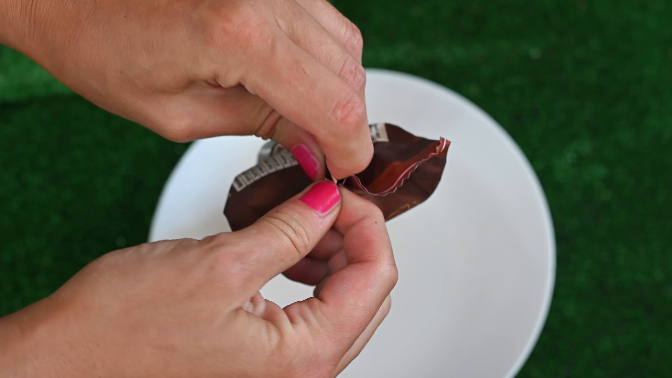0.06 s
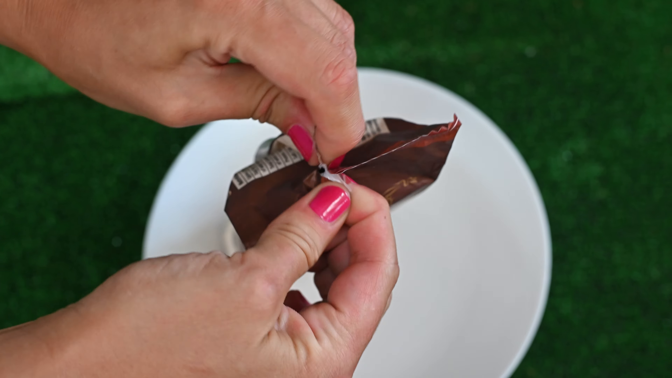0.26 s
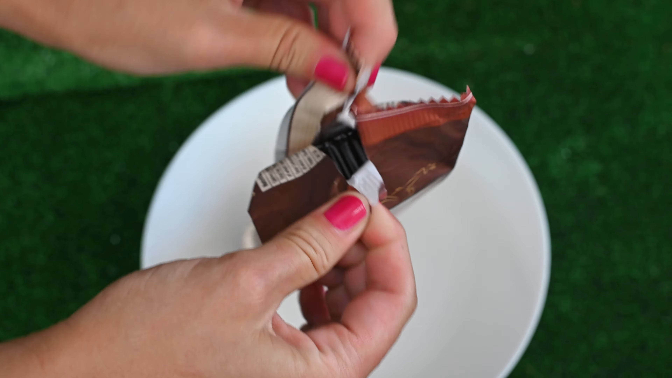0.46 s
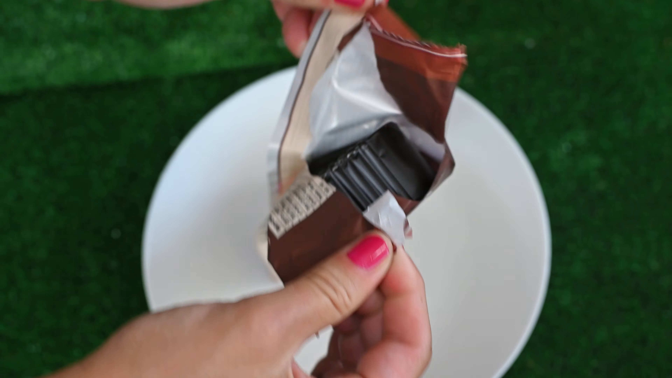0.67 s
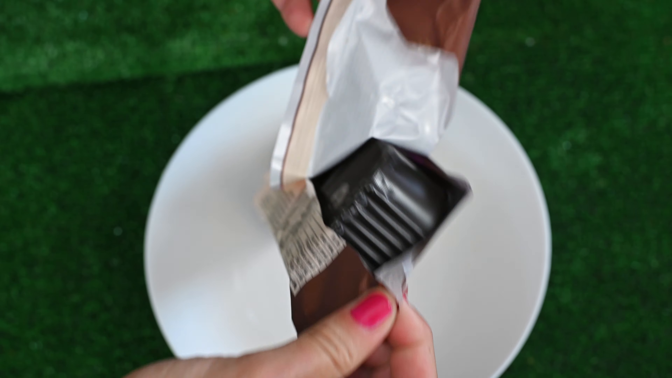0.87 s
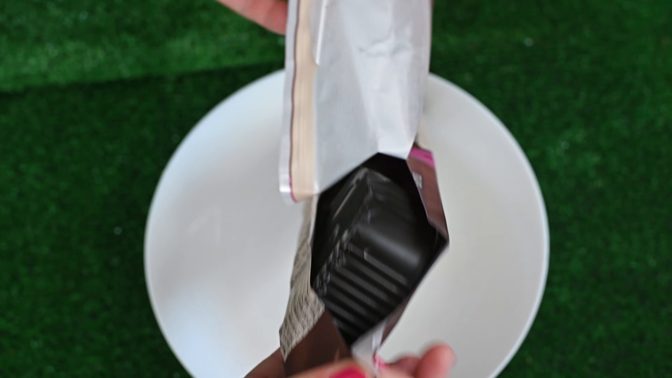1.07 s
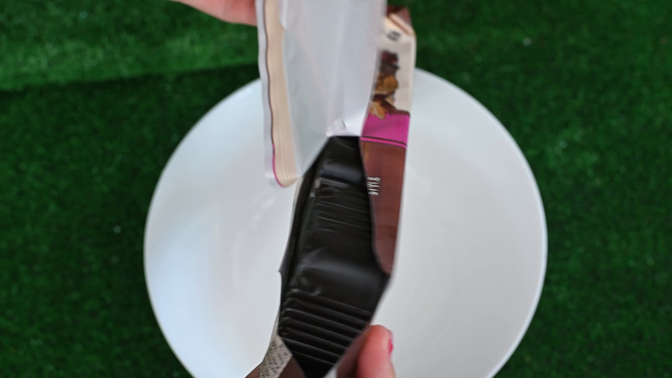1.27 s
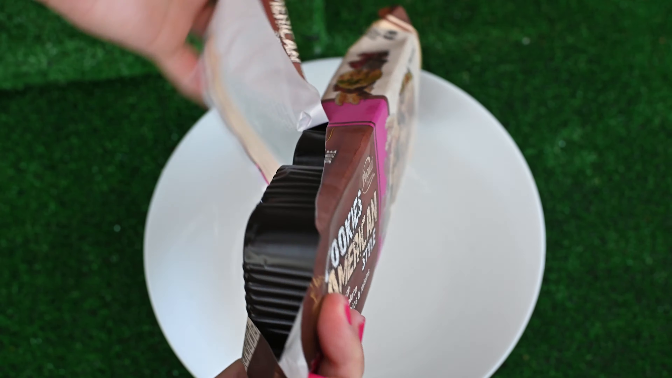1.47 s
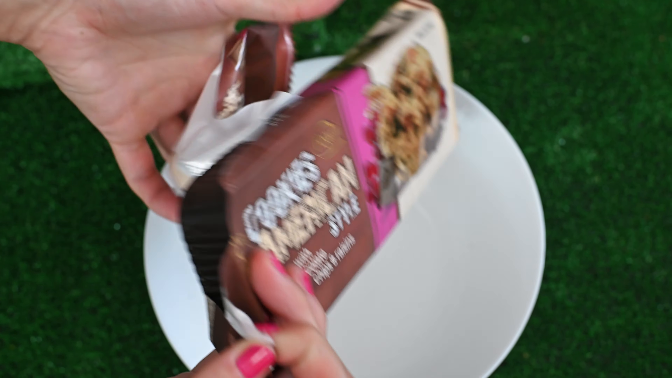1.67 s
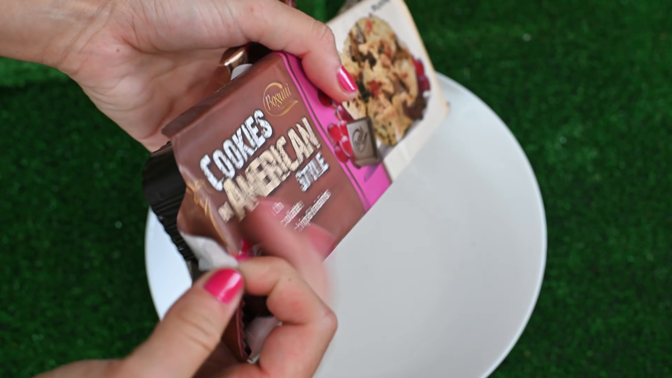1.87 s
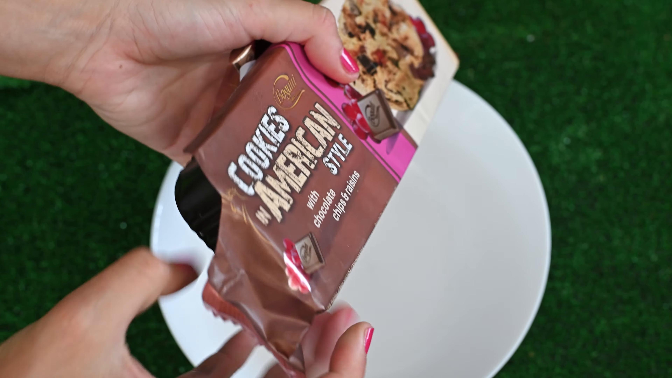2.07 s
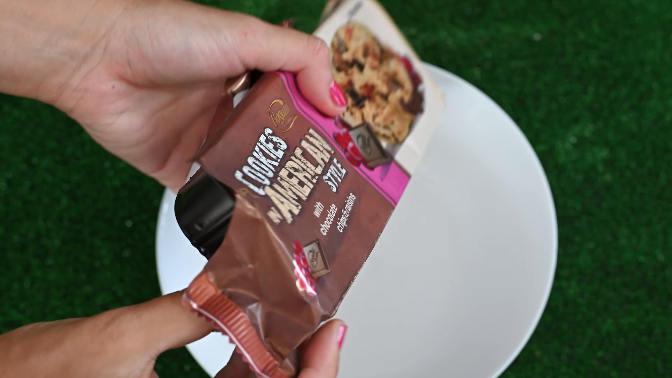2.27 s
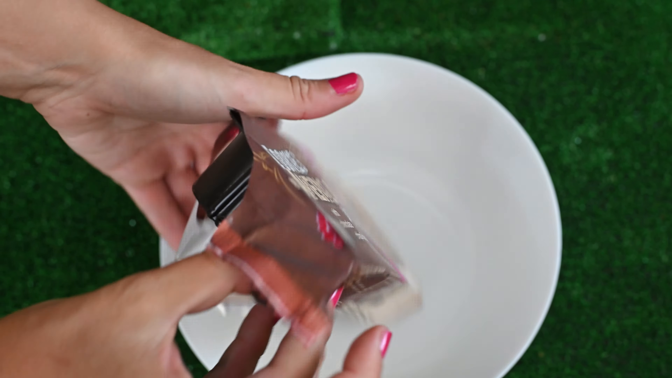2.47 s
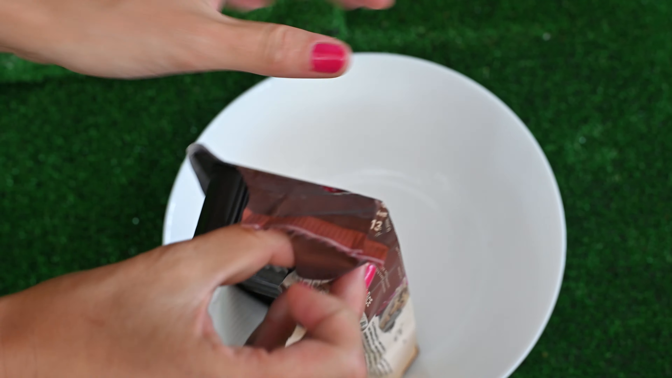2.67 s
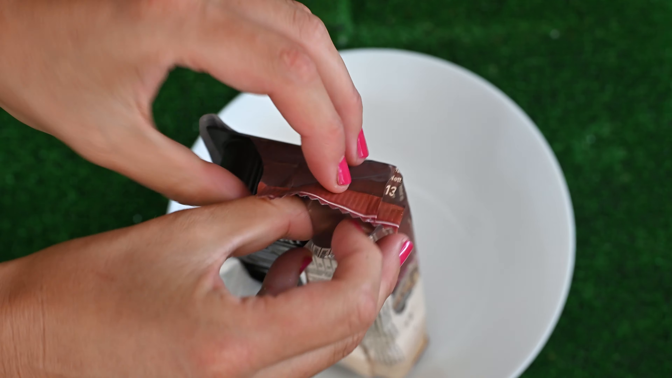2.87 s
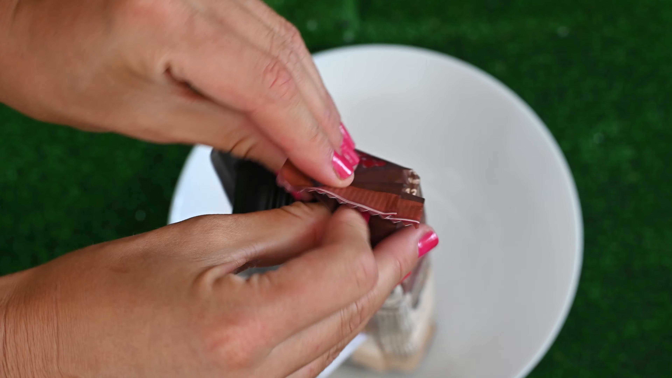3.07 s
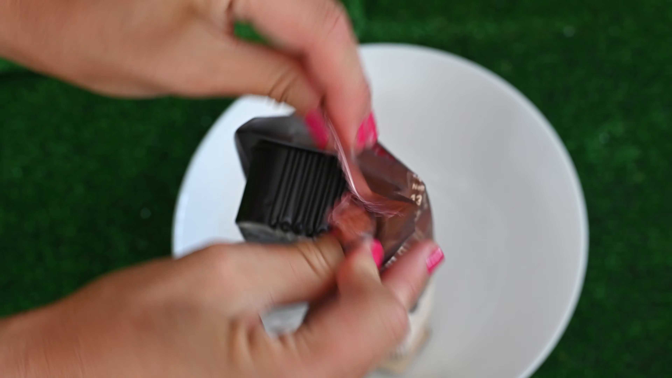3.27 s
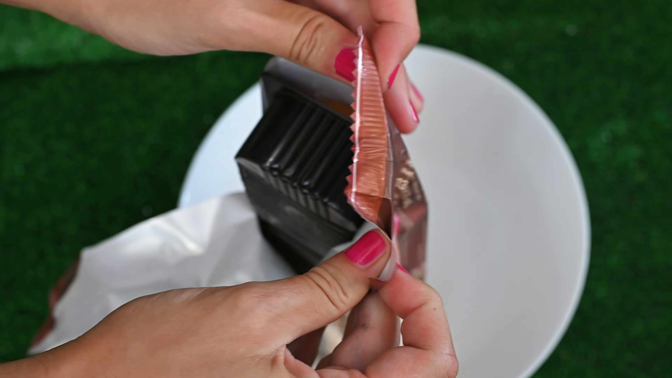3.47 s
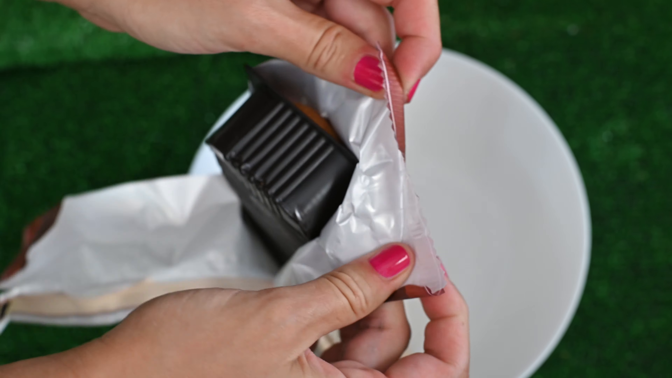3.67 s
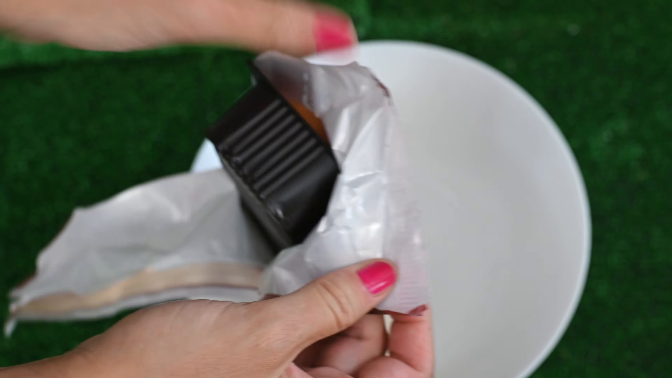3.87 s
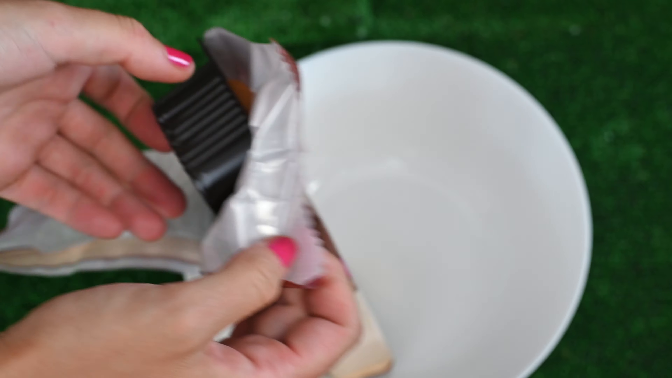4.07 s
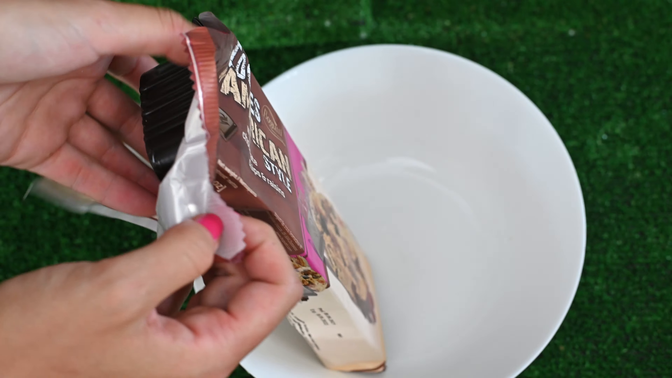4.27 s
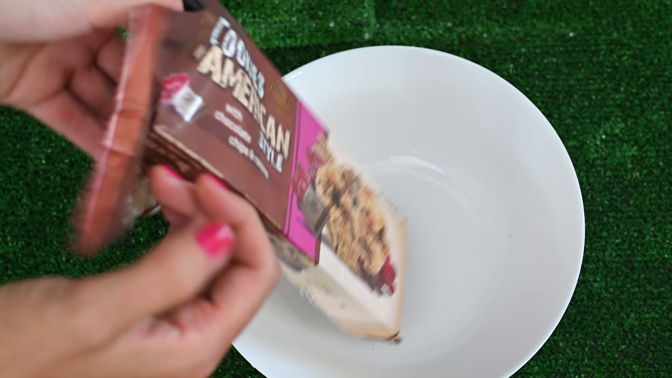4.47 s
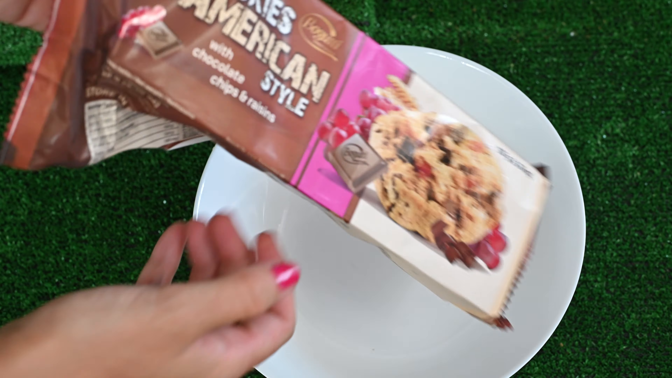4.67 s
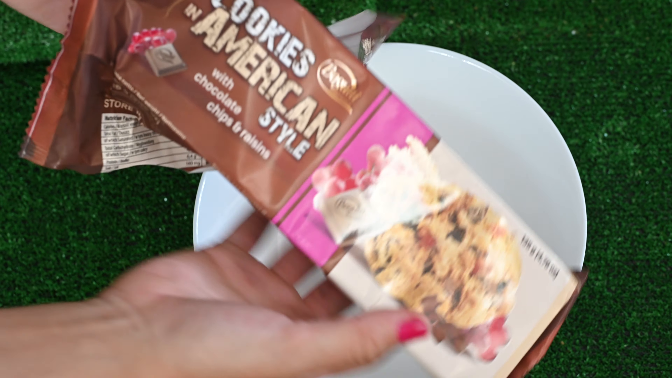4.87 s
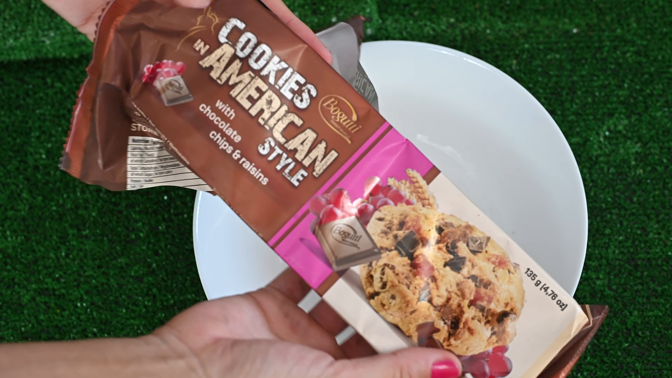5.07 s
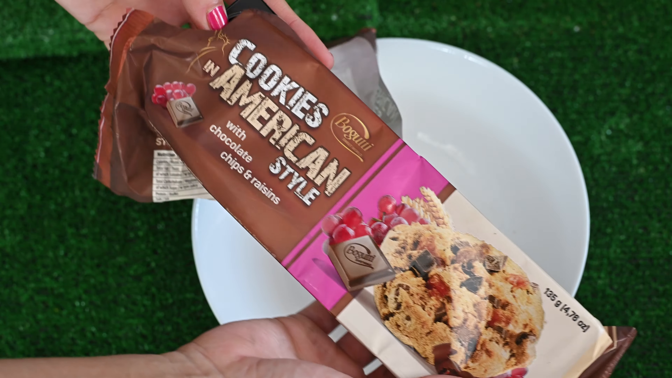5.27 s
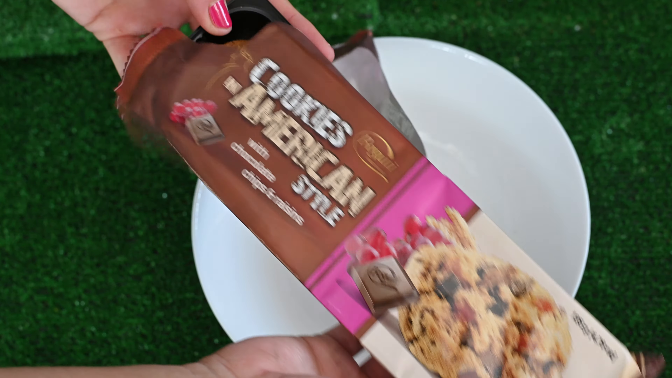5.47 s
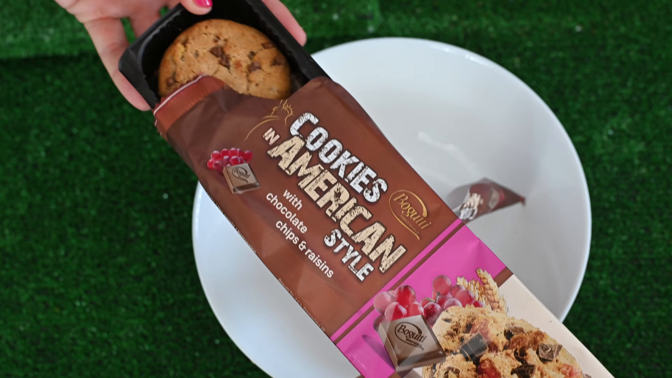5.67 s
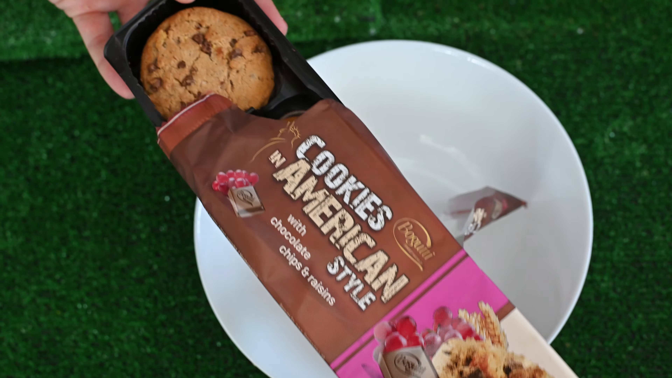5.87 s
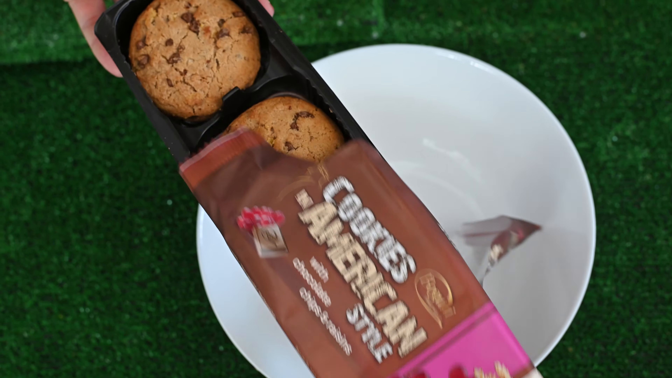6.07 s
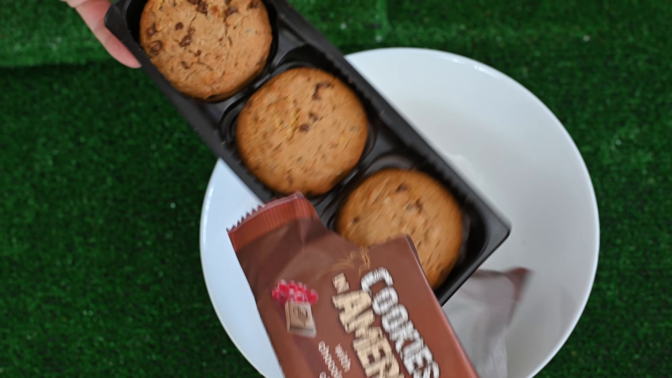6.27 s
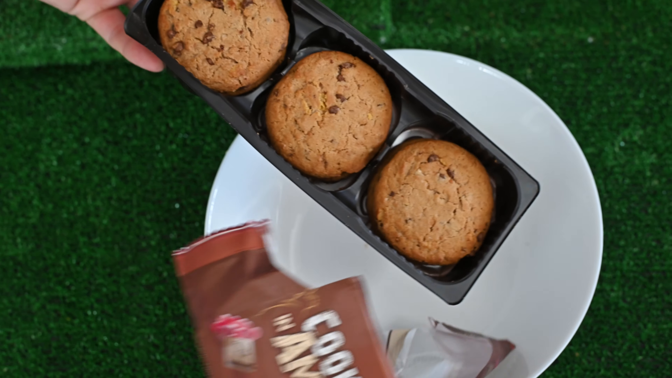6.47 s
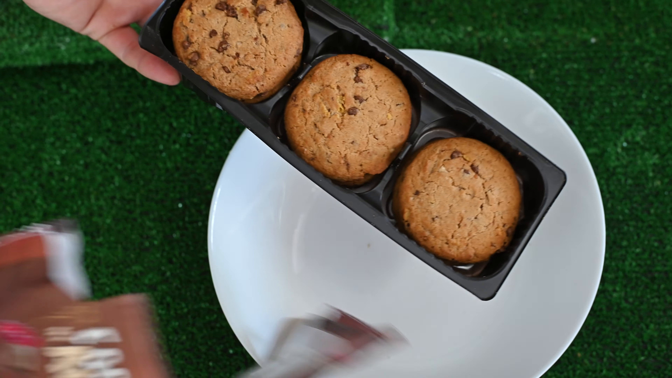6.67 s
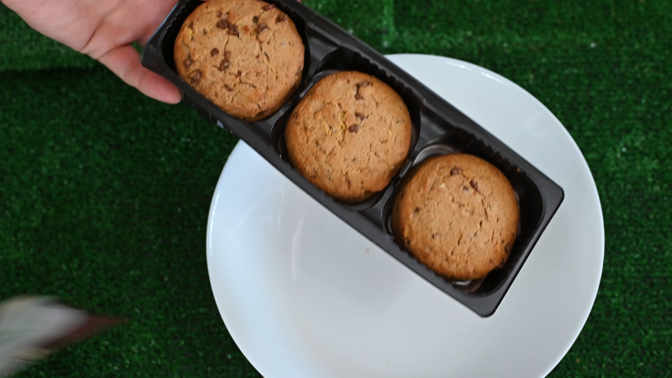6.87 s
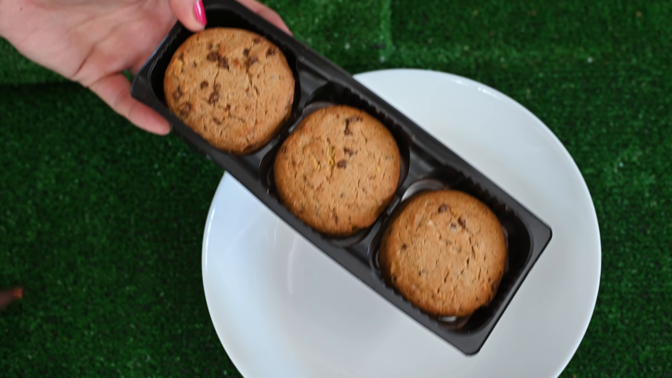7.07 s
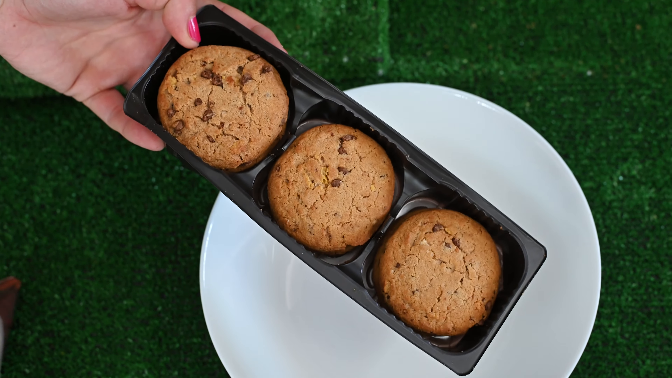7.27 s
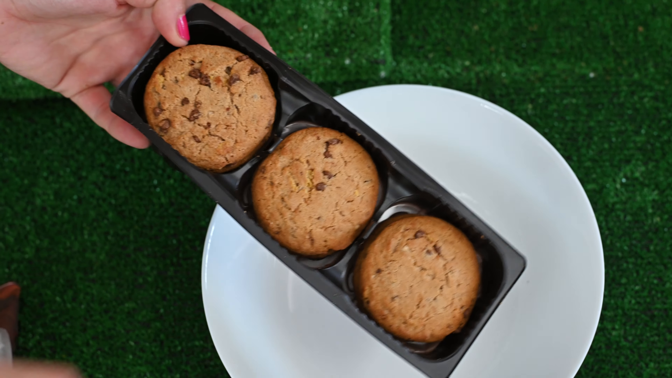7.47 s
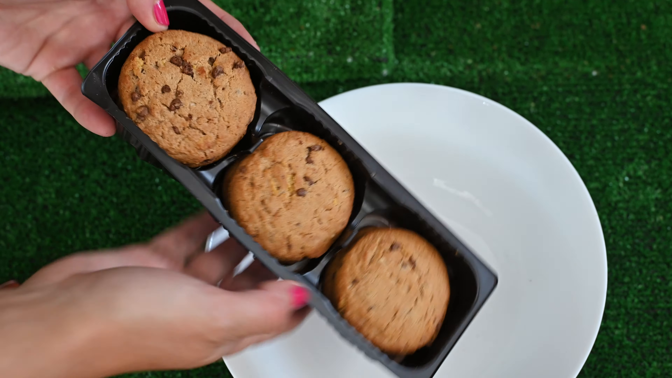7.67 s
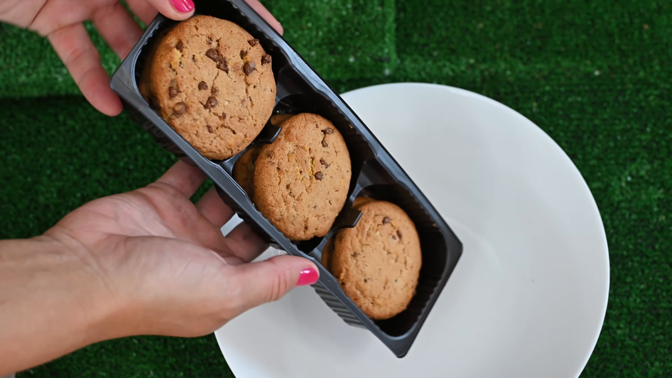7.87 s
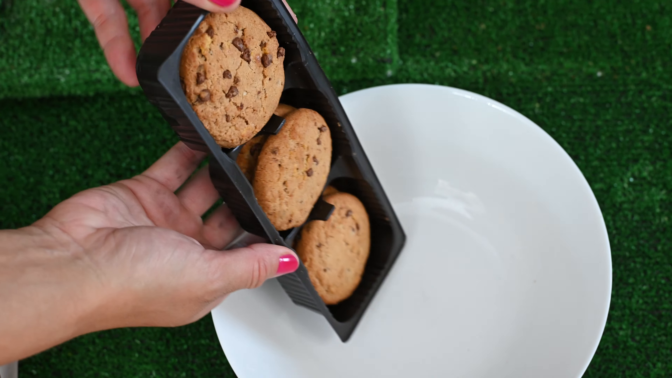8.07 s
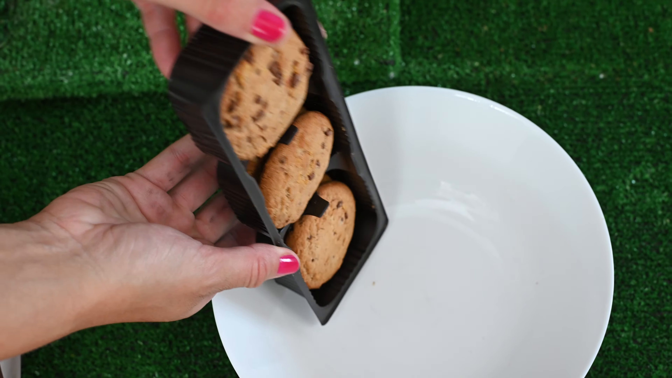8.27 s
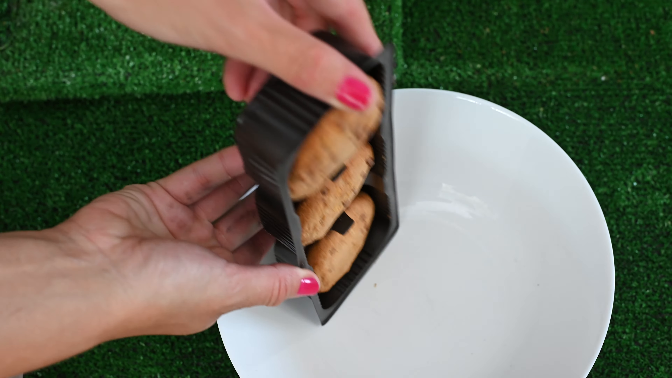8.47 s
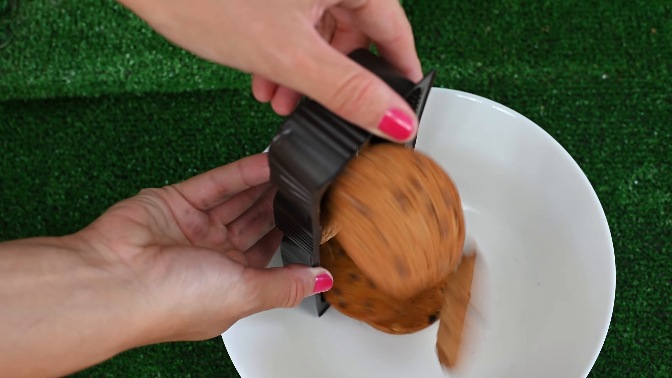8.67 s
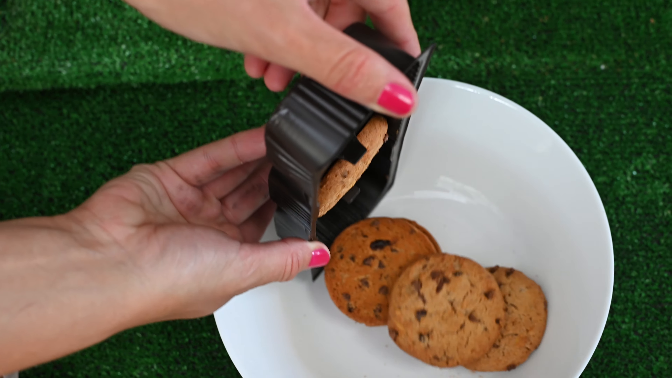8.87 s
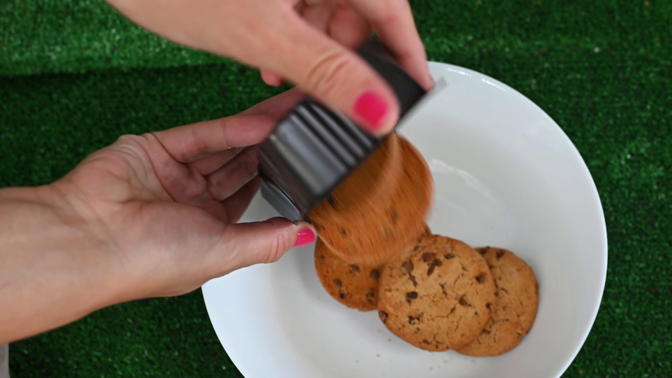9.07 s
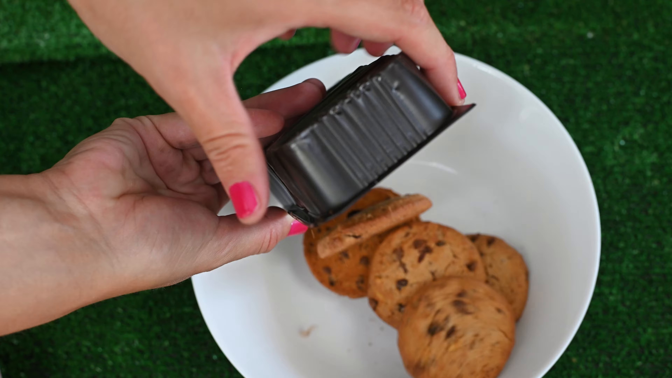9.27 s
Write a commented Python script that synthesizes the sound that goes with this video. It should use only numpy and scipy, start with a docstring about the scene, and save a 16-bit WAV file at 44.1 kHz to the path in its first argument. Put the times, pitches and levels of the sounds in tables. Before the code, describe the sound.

A thin plastic wrapper crinkles and tears open close by, then cookies tumble from a plastic tray into a ringing china bowl.

```python
"""A foil-plastic cookie wrapper is torn open close by; hands slide out the thin tray and tip it over a
china bowl. Buckling makes the crackle: tiny creases rustle with each stroke of the hands, big ones snap
singly, and the tray clicks as it bends. The cookies' impacts excite the normal modes of the bowl and
the table. A small room reverberates, over steady air noise and a low mains hum."""
import sys
import numpy as np
from scipy import signal
from scipy.fft import rfft, irfft
from scipy.io import wavfile
from scipy.ndimage import uniform_filter1d

SR = 44100
rng = np.random.default_rng(int(sys.argv[2]) if len(sys.argv) > 2 else 0)


def persist_wave(psi):
    """Save psi, clipped to +-1, as 16-bit WAV."""
    counts = np.round(np.clip(psi, -1, 1) * 32767).astype(np.int16)
    wavfile.write(sys.argv[1], SR, np.atleast_2d(counts).T)


N = 410571
T = np.arange(N) / SR

# Event levels are relative: each source applies its own gains to them.
# big creases of the wrapper buckling: start_s, facet_hz, level_db, brightness_db
WRAPPER_SNAPS = [(0.1362, 4730, -42.5, -11), (0.159, 3210, -41, -7), (0.1935, 3380, -42, 6),
                 (0.2135, 5860, -41.5, 4), (0.235, 5060, -29.5, 2), (0.296, 3200, -21.5, -3),
                 (0.3211, 4670, -33, -2), (0.3452, 5450, -33, -1), (0.3558, 10000, -29, -2),
                 (0.375, 5000, -42, -1), (0.3918, 1330, -33, -2.5), (0.402, 5480, -35.5, 3.5),
                 (0.4196, 4470, -35.5, 1), (0.4546, 5700, -29.5, 7.5), (0.4667, 4340, -29.5, 6),
                 (0.4914, 4800, -27, 1), (0.516, 3320, -29, 0.5), (0.539, 2450, -35.0, -8),
                 (0.5641, 3700, -34.5, -1), (0.6707, 5700, -32.5, 0.5), (0.72, 4670, -25.0, 0),
                 (0.7457, 4600, -29.5, 5), (0.756, 4450, -23, -3), (0.7936, 4770, -23, 2),
                 (0.8184, 3850, -32, 3), (0.8408, 7440, -24, 2.5), (0.8631, 1180, -23.5, -0.5),
                 (0.8945, 3800, -26, 0.5), (0.9201, 5650, -24.5, 2.5), (0.956, 1170, -27.5, -5.5),
                 (1.0056, 4500, -38.0, 3), (1.0591, 5280, -34, 6), (1.1, 5750, -33.5, -3),
                 (1.25, 5160, -35, -1), (1.403, 2150, -35.5, -1.5), (1.434, 4290, -30.0, -1.5),
                 (1.497, 2130, -25.5, 0), (1.5509, 4830, -32.5, 0), (1.6434, 5130, -28, 5.5),
                 (1.672, 5180, -32, 1.5), (1.7502, 2440, -33, 1.5), (1.8277, 3830, -36, 3),
                 (1.8594, 4600, -33.5, 4.5), (1.9245, 2470, -35.5, 2.5), (1.953, 5420, -33.0, 1),
                 (2.0294, 8970, -36, -1), (2.258, 6000, -39, 9), (2.2697, 8900, -33, 6.5),
                 (2.4567, 8850, -27.5, -1.5), (2.5256, 1200, -39, -7.5), (2.6075, 1940, -37, 0.5),
                 (2.711, 850, -37.5, -1), (2.8219, 2600, -47, 5), (3.0531, 8970, -34.5, 2.5),
                 (3.24, 1990, -42.5, 0), (3.279, 2330, -39.5, 1), (3.333, 4320, -27.5, 1),
                 (3.3539, 880, -32, -10), (3.373, 3250, -24.5, 1), (3.4048, 8830, -25, -1),
                 (3.4902, 5020, -37, 7.5), (3.5988, 5530, -33.5, 7), (3.6364, 4140, -32.5, -3),
                 (3.6721, 5170, -32, -3.5), (3.7134, 4370, -32.5, -4.5), (3.8298, 10690, -33.5, 3),
                 (4.0315, 4460, -43.5, -5), (4.1562, 5760, -31.5, 11.5), (4.198, 8700, -29, 0),
                 (4.206, 4960, -29, 1.5), (4.3192, 4250, -38, 0.5), (4.3938, 3190, -38, -3),
                 (4.4466, 3190, -39.5, -2), (4.5978, 2240, -36, -4), (4.6363, 4780, -42, 0),
                 (4.6437, 4700, -26, 3.5), (4.6499, 4580, -22.5, 4), (4.9604, 4980, -38.5, -2),
                 (5.049, 2280, -41.5, -2), (5.0834, 5000, -41.5, -4), (5.1202, 5460, -36.5, -4),
                 (5.149, 5400, -34.5, 0.5), (5.271, 2520, -41, -5.5), (5.3242, 9350, -35.5, 4),
                 (5.3386, 2500, -35.0, -3), (5.347, 2800, -32.5, -3), (5.5275, 5350, -30.5, -4),
                 (5.5449, 5840, -33, 6), (5.5696, 10300, -27, -0.5), (5.672, 2330, -40, -5),
                 (5.701, 5220, -32, -2), (5.9088, 8600, -32.5, -1), (5.9584, 1570, -42, -16.5),
                 (6.012, 9400, -37.5, 0), (6.1336, 9070, -37.5, -2.5), (6.1927, 1500, -36, 3),
                 (6.2106, 1499, -27.5, -1), (6.3203, 5940, -27, 2.5)]
# spectrum of the film: frequency_hz, gain_db
FILM_SPECTRUM = [(59, -49), (100, -6), (241, -4.5), (500, -3.5), (892, -0.5), (1850, -3), (2670, -4),
                 (4660, -2.5), (7150, -7), (9050, -5.5), (12000, -10.5), (15500, -21.5), (16900, -58)]
# hands pulling, tearing or sliding the packet, or working the tray: start_s, length_s, level_db, brightness_db
HAND_STROKES = [(-0.03, 0.26, -47, 5), (0.276, 0.12, -40, 1.5), (0.445, 0.062, -32.5, 6.5),
                (0.49, 0.097, -36, 1.5), (0.612, 0.11, -33.5, 3), (0.703, 0.19, -33, 1),
                (0.88, 0.114, -36.0, 1), (1.037, 0.082, -45, 3), (1.155, 0.093, -41.0, -1.5),
                (1.257, 0.1, -44, 1.5), (1.397, 0.23, -38.5, 3.5), (1.46, 0.067, -35.5, 1),
                (1.711, 0.056, -41.5, -1), (1.796, 0.057, -31.5, -0.5), (1.879, 0.12, -39.5, 0.5),
                (2.179, 0.46, -44.5, 0.5), (2.419, 0.094, -41, 2.5), (2.586, 0.062, -38.5, -2.5),
                (2.642, 0.17, -50, -6), (3.033, 0.24, -44, 2.5), (3.288, 0.12, -29.0, 4),
                (3.399, 0.14, -42.5, -1.5), (3.559, 0.091, -35.5, 2), (3.711, 0.12, -45.0, -0.5),
                (4.105, 0.13, -44, 4), (4.258, 0.094, -52, 4), (4.381, 0.14, -41, 2),
                (4.621, 0.038, -37, 8), (4.928, 0.66, -44, 2.5), (5.3, 0.021, -34.5, 2.5),
                (5.481, 0.15, -33.5, 4.5), (5.648, 0.055, -38.5, 6.5), (5.719, 0.17, -49, 5.5),
                (5.889, 0.37, -43.5, 5.5), (6.188, 0.019, -30.5, 1), (6.299, 0.069, -46, 2.5),
                (6.772, 0.38, -59, -0.5), (6.962, 0.026, -48, -7), (7.26, 0.19, -50, -0.5),
                (7.553, 0.062, -55.5, -3.5), (7.704, 0.072, -48, 3), (7.84, 0.22, -54, 0.5),
                (8.52, 0.057, -46, 1), (8.637, 0.06, -43.5, 0), (8.719, 0.18, -44.5, -7.5),
                (9.003, 0.11, -50.5, 4), (9.073, 0.1, -41, 0)]
# faint rustle of the packet while it is only held: time_s, level_db
GRIP_LEVELS = [(0, -59.5), (1.9, -61.5), (2.15, -71), (2.5, -52.5), (4.85, -58), (6.45, -63), (6.68, -67.5),
               (7.05, -58), (7.52, -65.5), (8.14, -70), (8.25, -60), (8.5, -65)]
# smooth sliding of tray and cookies, relative to the creasing: time_s, level_db
SLIDING_LEVELS = [(0, -7), (1, -12), (2.3, -7), (3.3, -12.5), (5.2, -5.5), (5.6, -6), (6.3, 0.5),
                  (6.8, -6.5), (8.2, -3), (9.1, 1.5)]
# the sealed seam peeling open: start_s, length_s, level_db
SEAM_PEELS = [(-.03, .26, -40), (0.432, 0.033, -29.5)]
# tray walls buckling, last as the emptied tray pops back: start_s, facet_hz, level_db, brightness_db
TRAY_BUCKLES = [(1.2114, 1856, -23.5, -1), (6.4611, 1870, -50, -6.5), (6.5352, 1630, -51, -15.5),
                (6.808, 10400, -53, 14), (6.8636, 1210, -41.5, 0.5), (6.9056, 890, -45.5, -7),
                (6.9772, 5650, -45.5, 7), (7.1753, 3100, -45, -8.5), (7.2784, 3730, -49, 5),
                (7.5825, 1840, -36, 3), (7.732, 1740, -32, 2.5), (7.836, 2470, -45.5, -4),
                (7.8503, 2940, -39, 4.5), (7.907, 2330, -30.5, 0.5), (8.0366, 2420, -41, -2.5),
                (8.173, 6760, -53, 1), (8.6597, 2630, -43, 9), (8.6805, 1540, -38, 2),
                (9.255, 6000, -33, 1), (9.2579, 5870, -18, 7.5), (9.262, 1350, -20.5, 0.5)]
# cookies landing: start_s, knock_db, bowl_db, contact_cutoff_hz, thump_db
COOKIE_LANDINGS = [(8.7413, -19, -60, 2000, -22.5), (8.7837, -17.5, -66, 1520, -17.5),
                   (8.8008, -21, -21.5, 1380, -30), (8.812, -36, -63, 4950, -42),
                   (8.824, -24, -42, 9000, -40), (8.868, -29, -29, 1490, -50),
                   (8.8792, -22.5, -39, 6000, -30), (8.891, -31, -28.5, 8600, -27),
                   (8.935, -44, -56, 810, -26.5), (9.231, -32, -70, 503, -20.5),
                   (9.289, -33, -39, 800, -22)]
# normal modes of a cookie, the china bowl and the table: frequency_hz, level_db, t60_s
COOKIE_MODES = [(757, 3.5, 0.038), (920, 3.5, 0.024), (1500, -1, 0.032), (2336, 2, 0.043),
                (3850, -33, 0.023), (4200, -24, 0.041)]
BOWL_MODES = [(366, 0, 1.55), (803, -2, 2.2), (1362, -14, 2.2), (2046, -9, 1.0), (2853, -9, .62),
              (3779, -10, .3), (4822, -8, .25), (7289, -15, .3), (7461, -14, .25), (8226, -13, .22),
              (9260, -8, .2), (9851, -9, .15), (13410, -17, .2)]
TABLE_MODES = [(58.4, -12, 0.94), (104.1, -5, 0.53), (126.7, 0.5, 0.23)]
# hands bumping the filled tray: start_s, level_db, pitch_hz
TRAY_BUMPS = [(0.284, -50.5, 253), (0.744, -24, 234), (0.884, -25, 227), (1.017, -32.5, 180),
              (1.579, -26.5, 103), (1.835, -23.5, 97), (2.603, -32, 223), (3.385, -24.5, 250),
              (3.586, -30, 242), (3.663, -33.5, 108.5), (4.515, -33.5, 196), (5.59, -35, 150),
              (6.21, -36, 160)]
# cookies skidding along the tray: start_s, level_db, initial_pitch_hz
COOKIE_SKIDS = [(6.335, -53, 1156), (6.868, -53, 1166), (7.915, -43.5, 1250), (8.555, -47, 986),
                (8.683, -37, 1430)]
# the wrapper's edge flicking the bowl's rim: start_s, level_db
BOWL_FLICKS = [(6.711, -51), (6.78, -58), (6.809, -40)]
# spectrum of the room's air noise: frequency_hz, gain_db
AIR_SPECTRUM = [(15, -24), (25, 1.5), (64, -1), (175, -7.5), (775, -13.5), (1130, -45), (1370, -17.5),
                (5140, -45.5), (9320, -34.5), (16000, -50)]
# partials of the mains hum: frequency_hz, level_db
HUM_PARTIALS = [(48.6, -55.5), (97.5, -64.5)]
# low, middle and high bands: lower_edge_hz, upper_edge_hz
BAND_EDGES = [(150, 1500), (1500, 6000), (6000, 19000)]


def snaps():
    """Buckling: a big crease of the film releases its elastic energy in a crack and a brief flutter."""
    facet_hz = np.transpose(WRAPPER_SNAPS)[1]
    clicks = buckles(facet_hz, crack_s=0.002, flutter_s=0.0048, flutter_db=2, facet_db=-3)
    return place_clicks(WRAPPER_SNAPS, clicks, trims_db=(-8, 0.7, -0.6), pan_db=-1.5, spread_db=2.2)


def buckles(facet_hz, crack_s, flutter_s, flutter_db, facet_db, cycles=5.6):
    """Snap-through: each facet cracks and rings as the sheet flutters. Gives events x 2 x samples."""
    t = np.arange(1400) / SR
    noise = rng.standard_normal((len(facet_hz), 2, len(t)))
    envelope = np.exp(-t / crack_s) + undb(flutter_db) * np.exp(-t / flutter_s)
    sheet = colour(noise * envelope, FILM_SPECTRUM)
    # an irregular facet rings for a few cycles in two unrelated modes
    turns = facet_hz[:, None] * t
    second_turns = turns * rng.uniform(0.84, 1.7, (len(facet_hz), 1))
    facet = np.sin(2 * np.pi * turns) * np.exp(-turns / cycles)
    facet += 0.12 * np.sin(2 * np.pi * second_turns) * np.exp(-second_turns / cycles)
    mid = unit(sheet[:, 0]) + undb(facet_db) * facet / facet.std(axis=1, keepdims=True)
    # short waves leave the crumpled sheet differently to left and right
    side = unit(sheet[:, 1])
    side_treble = signal.lfilter(*signal.butter(1, 8000, "high", fs=SR), side)
    side = undb(-12) * side + 0.47 * side_treble
    return np.stack([mid + side, mid - side], axis=1)


def place_clicks(rows, clicks, trims_db, pan_db, spread_db, facet_boost_db=3.5):
    """Radiation: each click has its own direction and is boosted in the band where its facet rings."""
    starts, facet_hz, db, bright_db = np.transpose(rows)
    shaped, out = 0, np.zeros((2, N))
    onset = int(0.008 * SR)  # the first 8 ms set the level
    for (lo, hi), gain in zip(BAND_EDGES, band_gains(db, bright_db, trims_db)):
        part = band(clicks, lo, hi)
        boost = undb(facet_boost_db * ((lo <= facet_hz) & (facet_hz < hi)))
        onset_rms = part[..., :onset].mean(axis=1).std(axis=1)
        shaped = shaped + part * (gain * boost / onset_rms)[:, None, None]
    for start, click in zip(starts, shaped):
        add(out, start, click * pan(pan_db + spread_db * rng.standard_normal()))
    return out


def rustle(creases_per_s=340, size_spread_db=5.5, smoothing_s=0.05):
    """Crackling noise: tiny creases flip as a Poisson process, over the hiss of sliding friction."""
    gains = handling()
    effort_db = 20 * np.log10(gains[1] / np.median(gains[1]))
    rate = creases_per_s * np.exp(-0.01 * effort_db)  # slightly sparser in loud strokes
    flips = rng.random(N) < rate / SR
    sizes = undb(size_spread_db * np.minimum(rng.exponential(size=N), 3.4))
    facet_hz = np.geomspace(850, 10500, num=40)
    facets = buckles(facet_hz, crack_s=0.00039, flutter_s=0.0034, flutter_db=4, facet_db=-4.5, cycles=5.3)
    which, crackle = rng.integers(len(facets), size=N), np.zeros((2, N))
    for i in np.flatnonzero(flips):
        add(crackle, i / SR, sizes[i] * facets[which[i]])
    hiss = colour(stereo_noise(N, width=0.5), FILM_SPECTRUM)
    slide_db = np.interp(T, *np.transpose(SLIDING_LEVELS))
    sheet, out = unit(crackle) + undb(slide_db) * unit(hiss), 0
    for edges, gain in zip(BAND_EDGES, gains):
        part = band(sheet, *edges)
        # the hands set how much energy the creases share at each moment
        power = uniform_filter1d(part.mean(axis=0) ** 2, size=int(smoothing_s * SR))
        out = out + part * gain / np.sqrt(np.abs(power) + 1e-12)
    return out * pan(-0.9)


def handling(trims_db=(-2.5, -0.02, -7), grip_bright_db=1.5):
    """Incoherent sources add in power: grip and strokes sum to the rustle's gain in each band."""
    t = T[::64]
    grip_db = np.interp(t, *np.transpose(GRIP_LEVELS))
    power = np.square(band_gains(grip_db, grip_bright_db, trims_db))
    for start, length, db, bright_db in HAND_STROKES:
        power += np.outer(band_gains(db, bright_db, trims_db), stroke_shape(t, start, length)) ** 2
    return [np.interp(T, t, np.sqrt(band_power)) for band_power in power]


def stroke_shape(t, start, length, attack_s=0.034, release_db_per_s=225):
    """Envelope of a hand movement: a linear rise, and exponential decay once the stroke ends."""
    attack = np.clip((t - start) / attack_s, 0, 1)
    return attack * undb(-release_db_per_s * np.maximum(t - start - length, 0))


def peels(jerks_per_s=85, jitter=0.39, jerk_s=0.0032, spread_db=2.5):
    """Stick-slip: the glue lets go in quick uneven jerks, each a bright fizz from the taut film."""
    gap_draws, size_draws = rng.standard_normal((2, 2000))
    starts = np.cumsum(np.exp(jitter * gap_draws) / jerks_per_s)
    jerks = np.zeros(N)
    for start, db in zip(starts, spread_db * size_draws):
        add(jerks, start, undb([db]))
    slip = 0.17 + signal.lfilter([1], [1, -np.exp(-1 / (jerk_s * SR))], jerks)
    film = colour(slip * stereo_noise(N, width=0.45), FILM_SPECTRUM)
    envelope = sum(undb(db) * stroke_shape(T, start, length) for start, length, db in SEAM_PEELS)
    return unit(band(film, 3400, 12500)) * envelope


def tray_clicks():
    """Shell buckling: the stiffer tray gives way with a deeper, hollower click."""
    facet_hz = np.transpose(TRAY_BUCKLES)[1]
    clicks = buckles(facet_hz, crack_s=0.002, flutter_s=0.0062, flutter_db=2.5, facet_db=-4, cycles=6.7)
    return place_clicks(TRAY_BUCKLES, clicks, trims_db=(-3.6, 1.83, -6), pan_db=-1.2, spread_db=2.3)


def cookies(grit_s=0.0085, detune=0.03, table_rise_s=0.0056, table_phase_rad=0.68):
    """Impact excitation: a landing grinds off grit and drives the modes of cookie, bowl and table."""
    out, t = np.zeros((2, N)), np.arange(int(0.6 * SR)) / SR
    table_phases = np.array([[table_phase_rad], [-table_phase_rad]])
    for start, knock_db, bowl_db, cutoff_hz, thump_db in COOKIE_LANDINGS:
        grit = rng.standard_normal((2, len(t))) * rng.exponential(size=len(t)) * np.exp(-t / grit_s)
        body = ring(COOKIE_MODES, t * (1 + detune * rng.standard_normal()))
        knock = 0.59 * body + undb(-10) * band(grit, 350, 11800)
        # the heavy table swings up slowly and reaches left and right out of step
        thump = ring(TABLE_MODES, t, phase=table_phases) * (1 - np.exp(-t / table_rise_s))
        # the bowl's deepest mode radiates lopsidedly
        bowl = ring(BOWL_MODES[:1], t, cutoff_hz) * pan(-6) + ring(BOWL_MODES[1:], t, cutoff_hz) * pan(-1)
        add(out, start, undb(knock_db) * knock + undb(thump_db) * thump + undb(bowl_db) * bowl)
    return out


def bumps(rise_s=0.0073, fall_s=0.021):
    """Soft contact excites low frequencies: fingers thud dully against the tray."""
    out, t = np.zeros((2, N)), np.arange(SR // 5) / SR
    envelope = (1 - np.exp(-t / rise_s)) * np.exp(-t / fall_s)
    for start, db, hz in TRAY_BUMPS:
        body = unit(band(stereo_noise(len(t), width=1), hz / 1.8, hz * 1.63))
        add(out, start, undb(db - 3) * body * envelope)
    return out


def skids(rise_s=0.001, decay_s=0.029, sag_octaves_per_s=8, width_hz=510):
    """Friction drives a resonance: a skidding cookie rings the tray's hollow, falling in pitch."""
    out, t = np.zeros(N), np.arange(SR // 4) / SR
    envelope = (1 - np.exp(-t / rise_s)) * np.exp(-t / decay_s)
    for start, db, hz in COOKIE_SKIDS:
        grit = signal.lfilter(*signal.butter(2, width_hz / 2, fs=SR), rng.standard_normal(len(t)))
        turns = np.cumsum(hz * 2 ** (-sag_octaves_per_s * t)) / SR
        add(out, start, undb(db) * unit(grit * np.sin(2 * np.pi * turns)) * envelope)
    return out


def crumbs(grains_per_s=1500, relative_db=-30, settle_s=0.031):
    """Shot noise: crumbs break off at each landing and patter over the china."""
    out, t = np.zeros((2, N)), np.arange(SR // 4) / SR
    for start, knock_db, *_ in COOKIE_LANDINGS:
        grains = (rng.random(len(t)) < grains_per_s / SR) * stereo_noise(len(t), width=0.5)
        patter = unit(band(grains, 5000, 16000)) * np.exp(-t / settle_s)
        add(out, start, undb(knock_db + relative_db) * patter)
    return out


def rim_flicks(centre_hz=3850):
    """Selective excitation: the light film wakes only the bowl's upper modes."""
    out = np.zeros(N)
    chime = band(ring(BOWL_MODES, np.arange(SR) / SR), centre_hz / 1.17, centre_hz * 1.17)
    for start, db in BOWL_FLICKS:
        add(out, start, undb(db) * chime)
    return out


def finger_rub(peak_s=4.1, width_s=0.17, level_db=-53, centre_hz=470):
    """Friction noise: a fingertip drags along the tray, which resonates hollowly."""
    hollow = unit(band(rng.standard_normal(N), centre_hz / 1.3, centre_hz * 1.3))
    return undb(level_db) * np.exp(-((T - peak_s) / width_s) ** 2) * hollow


def room(x, wet_db=-18, band_t60_s=(0.24, 0.38, 0.24), band_db=(0, 0, -3), build_s=0.0074):
    """Reverberation: a small room's diffuse field decays exponentially, slowest in the middle band."""
    t = np.arange(SR // 2) / SR
    noise = rng.standard_normal((2, len(t))) + 0.86 * rng.standard_normal(len(t))
    tail = sum(band(noise, *edges) * undb(db - 60 * t / t60)
               for edges, t60, db in zip(BAND_EDGES, band_t60_s, band_db))
    build_up = 1 - np.exp(-(t / build_s) ** 2)
    response = unit(tail * build_up) / np.sqrt(len(t))
    return undb(wet_db) * signal.fftconvolve(x, response, axes=1)[:, :N]


def room_tone(air_db=-55.5, waver_rad=0.32, offset_rad=0.93):
    """Noise floor: steady air noise and a wavering mains hum, its phase different at left and right."""
    air = unit(colour(rng.standard_normal((2, N)) + 0.5 * rng.standard_normal(N), AIR_SPECTRUM))
    knots = np.linspace(0, T[-1], num=60)
    waver = waver_rad * np.interp(T, knots, rng.standard_normal(len(knots)))
    phase = waver + np.array([[offset_rad], [-offset_rad]])
    hum = sum(undb(db) * np.sqrt(2) * np.sin(2 * np.pi * hz * T + phase) for hz, db in HUM_PARTIALS)
    return undb(air_db) * air + hum


def ring(modes, t, cutoff_hz=np.inf, phase=0):
    """Superposition of damped modes after a blow; a soft contact weakens those above the cutoff."""
    return sum(undb(db - 60 * t / t60) * np.sin(2 * np.pi * hz * t + phase) / np.hypot(1, hz / cutoff_hz)
               for hz, db, t60 in modes)


def colour(x, spectrum, size=4096):
    """Minimum-phase filtering: folding the cepstrum gives a causal response with the given spectrum."""
    hz, db = np.transpose(spectrum)
    bin_hz = np.arange(size // 2 + 1) * SR / size
    gain = undb(np.interp(np.log(bin_hz + 1), np.log(hz), db))
    cepstrum = irfft(np.log(gain))
    cepstrum[1:size // 2] *= 2
    cepstrum[size // 2 + 1:] = 0
    response = irfft(np.exp(rfft(cepstrum))).reshape((1,) * (x.ndim - 1) + (size,))
    return signal.fftconvolve(x, response, axes=-1)[..., :x.shape[-1]]


def band_gains(db, bright_db, trims_db):
    """Spectral tilt: brightness lifts the high band and lowers the low one equally."""
    return [undb(db + trim_db + slope * bright_db) for slope, trim_db in zip((-1, 0, 1), trims_db)]


def band(x, lo, hi):
    """Causal band-pass filtering between two frequencies in Hz."""
    return signal.sosfilt(signal.butter(3, [lo, hi], "band", fs=SR, output="sos"), x)


def stereo_noise(samples, width):
    """Partial coherence: common noise plus an independent part in each channel."""
    return rng.standard_normal(samples) + width * rng.standard_normal((2, samples))


def pan(db):
    """Level difference gives direction: channel gains for left minus right in dB."""
    return undb([[db / 2], [-db / 2]])


def undb(db):
    """Decibels to amplitude ratio."""
    return 10 ** (np.asarray(db) / 20)


def unit(x):
    """Normalisation to rms 1."""
    return x / np.sqrt(np.mean(x ** 2) + 1e-20)


def add(out, start_s, x):
    """Superposition of x on out from start_s on."""
    i = int(start_s * SR)
    out[..., i:i + x.shape[-1]] += x[..., :max(N - i, 0)]


def scene():
    """The direct sound of wrapper, tray and bowl adds to the reverberant field and the noise floor."""
    packet = snaps() + tray_clicks() + rustle() + peels() + bumps() + finger_rub() + rim_flicks()
    direct = packet + skids() + cookies() + crumbs()
    return direct + room(direct) + room_tone()


def record(dry, cutoff_hz=16200):
    """Band limiting: a steep low-pass follows clipping at full scale."""
    return signal.sosfilt(signal.ellip(8, 0.2, 70, cutoff_hz, fs=SR, output="sos"), np.clip(dry, -1, 1))


dry = scene()
out = record(dry)
persist_wave(out)
```